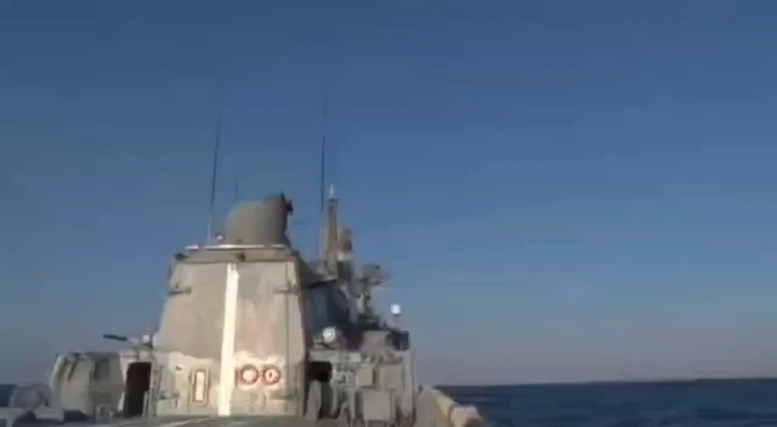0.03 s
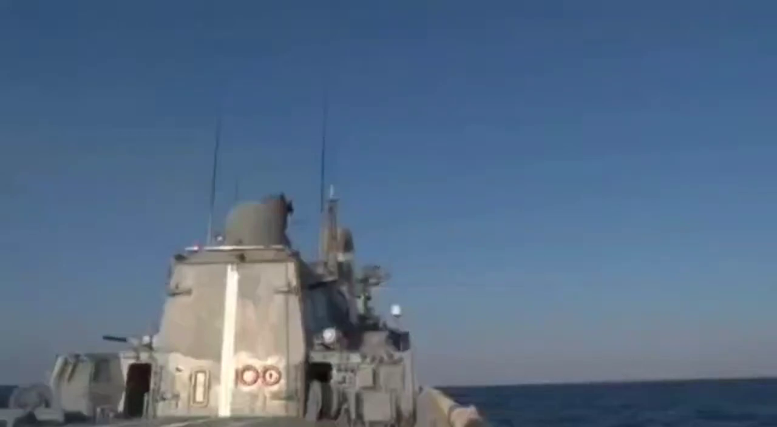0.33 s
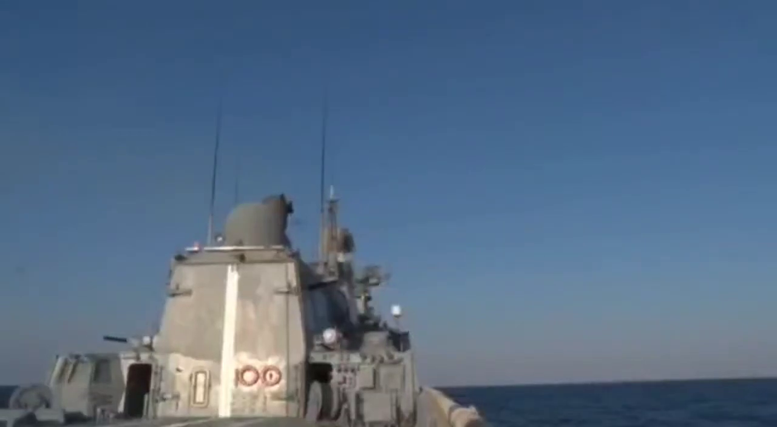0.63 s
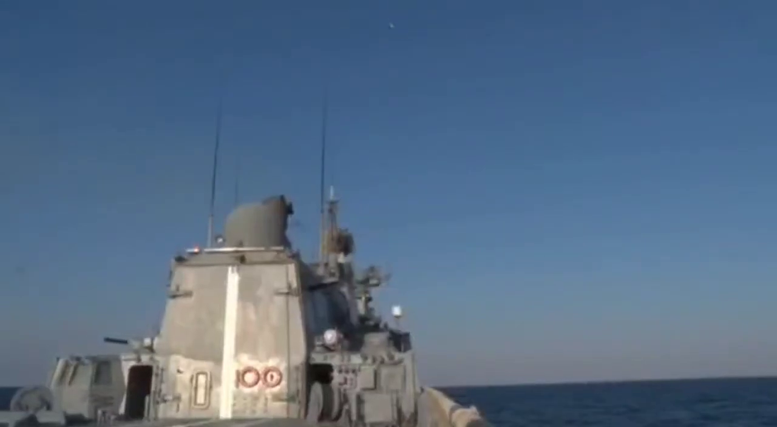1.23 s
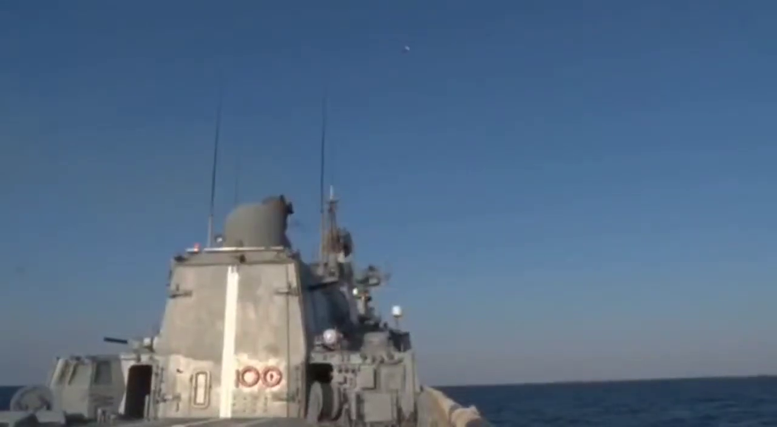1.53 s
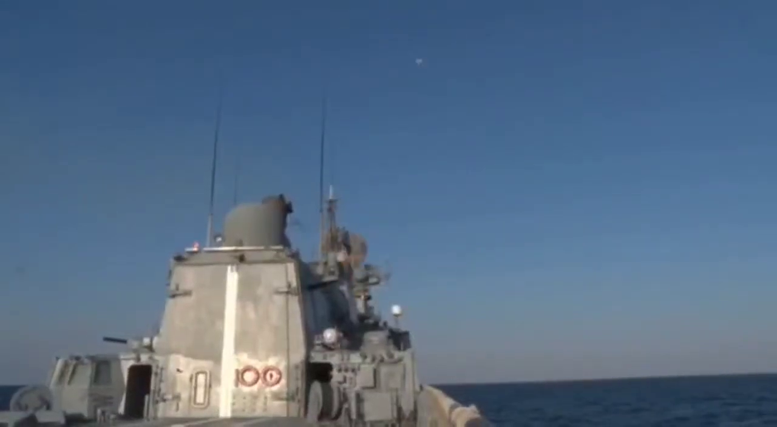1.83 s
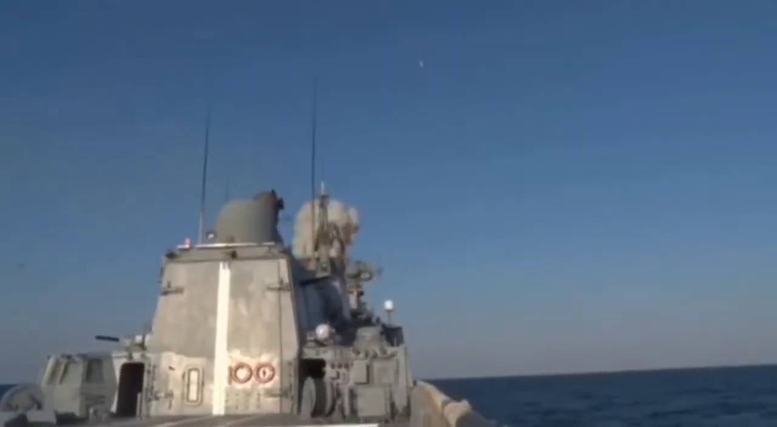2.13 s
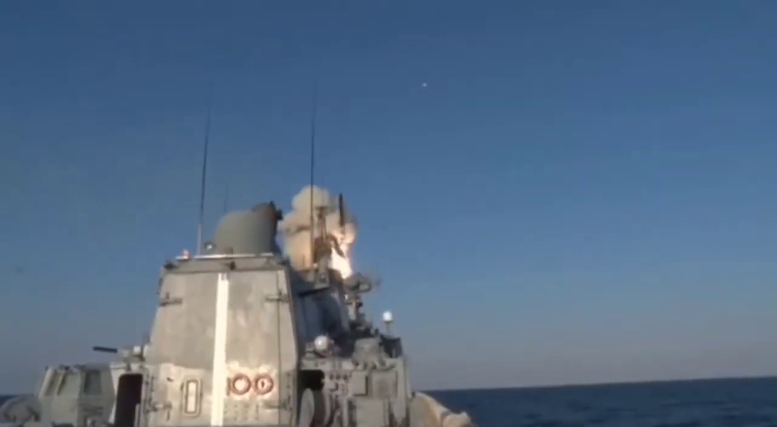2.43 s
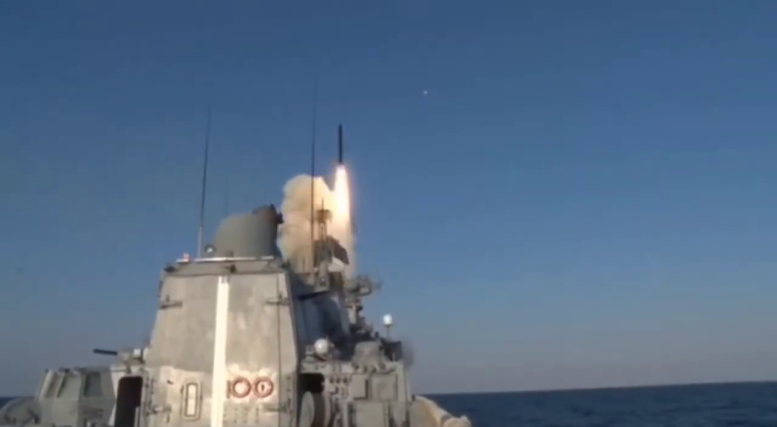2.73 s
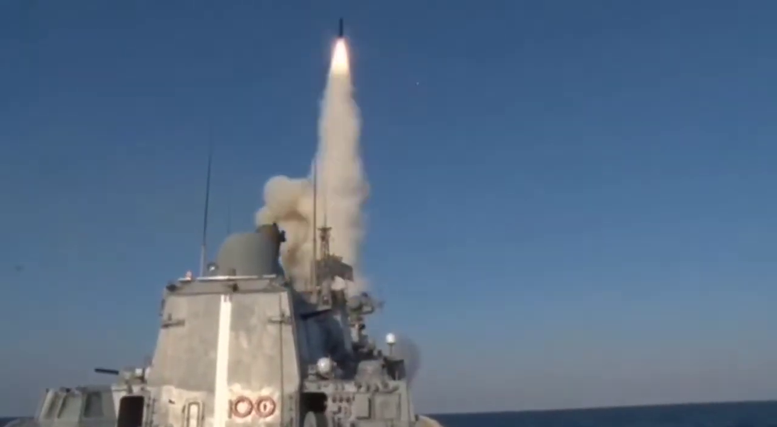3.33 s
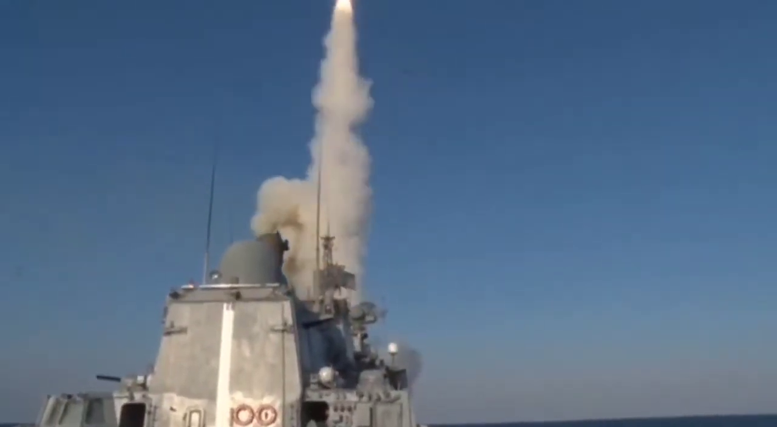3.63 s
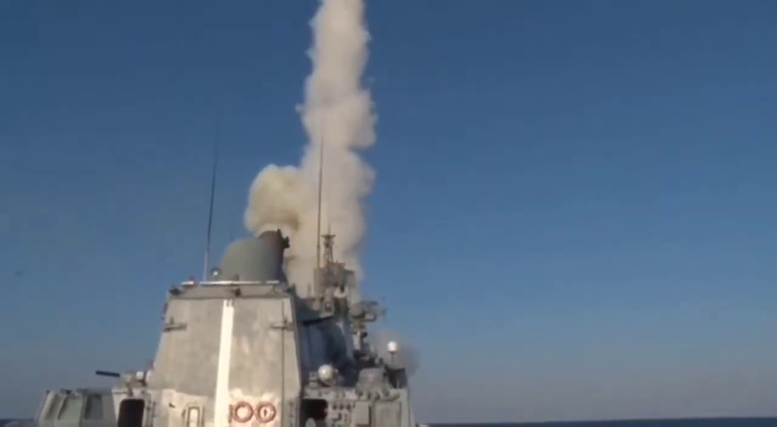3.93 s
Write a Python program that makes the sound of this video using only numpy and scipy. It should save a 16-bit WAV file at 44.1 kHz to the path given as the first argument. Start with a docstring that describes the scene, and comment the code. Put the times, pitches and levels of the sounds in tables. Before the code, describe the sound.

A missile launches from a warship. Soft wind and sea wash give way to low thumps and a hollow rush of gas, then the motor lights and swells into a loud, crackling roar that overloads the microphone.

```python
"""On a warship's deck, in wind and sea noise, a missile leaves its vertical launcher.
Gas throws it out with low thumps and a rush; then the motor lights and its roar deepens as it climbs.
The launcher rings under the gas and the flame. The sound bouncing off the deck arrives later and
later, sweeping the roar downward, and the microphone overloads."""
import sys
import numpy as np
from scipy import signal
from scipy.fft import rfft, irfft
from scipy.io import wavfile
from scipy.ndimage import uniform_filter1d

SR = 44100
rng = np.random.default_rng(int(sys.argv[2]) if len(sys.argv) > 2 else 0)


def waveform_to_disk(signal):
    """Save audio, clipped to [-1, 1], as 16-bit WAV at the path in sys.argv[1]."""
    frames = np.transpose(np.atleast_2d(signal))
    scaled = np.clip(frames, -1, 1) * 32767
    samples = np.round(scaled).astype(np.int16)
    wavfile.write(sys.argv[1], SR, samples)


N = 176400
T = np.arange(N) / SR

# The motor's four sounds, from low to high. Each row: pitch in Hz, strength in dB.
BOOM_TONE = [(15, -12.5), (35, -11), (70, -1), (110, 2.5), (160, -1), (230, -11.5), (600, -48.5)]
RUMBLE_TONE = [(20, -33.5), (70, -15), (120, -5.5), (170, -1.5), (215, -2), (270, -3), (350, -8.5),
               (700, -19), (2000, -51)]
ROAR_TONE = [(100, -21), (300, -8), (420, -1.5), (530, -1), (680, -4.5), (850, -5.5), (1100, -9.5),
             (1600, -13), (3000, -22.5), (9000, -39.5)]
HISS_TONE = [(300, -21.5), (900, -4), (1400, 0), (1900, -2.5), (2350, 0), (2750, -2.5), (3300, -2),
             (4800, -6.5), (6500, -12), (8300, -14), (9300, -34.5)]
# How the boom builds. Each row: time in seconds, level in dB.
BOOM_LEVELS = [(2.2, -45), (2.6, -30.5), (3.0, -32), (3.3, -14.5), (3.7, -13.5), (4, -14)]
# How the other three build. Each row: time in seconds, then rumble, roar and hiss levels in dB.
MOTOR_LEVELS = [(2.2, -50, -30.5, -57), (2.238, -40, -24.5, -41), (2.262, -23, -22.5, -28.5),
                (2.34, -35, -28, -25), (2.42, -43, -19.5, -24), (2.5, -31, -19, -20),
                (2.68, -18, -18.5, -14), (2.78, -8.5, -5.5, -8), (3.1, -8.5, -1.5, -3),
                (3.4, -6, -2.5, -7.5), (3.7, -9, -6.5, -10), (3.9, -4.5, -8, -12), (4, -2.5, -4.5, -12)]

def motor():
    """The nozzle hisses and shocks crackle; roar and rumble grow as the flame rises into the open."""
    rumble_db, roar_db, hiss_db = (curve(np.array(MOTOR_LEVELS)[:, [0, k]]) for k in (1, 2, 3))
    shock_hits = rng.random(N) < 900 / SR  # about 900 a second
    shocks = shock_hits * amp(3 * np.minimum(rng.exponential(1, N), 3))
    crackle = amp(-8.5) * unit(colour(shocks.mean() - shocks, HISS_TONE))
    hiss = rush(HISS_TONE, patchy_db=2, flutter_db=0.3, flutter_hz=72.6) + crackle
    roar = rush(ROAR_TONE, patchy_db=2.5, flutter_db=0.5, flutter_hz=31.4)
    rumble = rush(RUMBLE_TONE, patchy_db=0.5, flutter_db=0, flutter_hz=6.7)
    boom = rush(BOOM_TONE, patchy_db=1.5, flutter_db=0.5, flutter_hz=15) * loudness(BOOM_LEVELS)
    exhaust = boom + rumble * amp(rumble_db) + roar * amp(roar_db) + hiss * amp(hiss_db)
    lit = T > MOTOR_LEVELS[0][0]
    return deck_echo(exhaust) * lit


# How late the deck's echo arrives. Each row: time in seconds, delay in milliseconds.
ECHO_DELAYS = [(2.25, 0.64), (2.6, 1.13), (2.82, 1.52), (3.12, 2.21), (3.35, 2.87), (3.56, 3.8),
               (3.75, 4.3), (3.92, 4.7), (4, 4.66)]

def deck_echo(x):
    """The deck adds a duller echo that gets later and stronger as the missile climbs."""
    dull = signal.sosfilt(signal.butter(1, 2200, fs=SR, output="sos"), x)
    delay_ms = curve(ECHO_DELAYS)
    echo = np.interp(T - delay_ms / 1000, T, dull)
    share = .15 + .06 * delay_ms  # stronger as the sound comes down more steeply
    return (x + share * echo) / np.hypot(1, share)


# The venting hiss and the rush of gas. Each row: pitch in Hz, strength in dB.
VENT_TONE = [(300, -5), (850, -4.5), (1100, -7), (2300, -4), (3500, -5.5), (5000, -8), (7000, -16.5),
             (9000, -27)]
GAS_TONE = [(18, -37), (30, -11), (54, 1), (148, -6), (207, -1.5), (334, -16.5), (526, -12), (565, -17.5),
            (607, -16.5), (668, -17), (1240, -25), (2000, -26.5), (2660, -28.5), (3630, -29.5), (6000, -41),
            (7800, -47), (9000, -59.5), (11700, -70), (19800, -120)]
# How each rises and falls. Each row: time in seconds, level in dB.
VENT_LEVELS = [(1.685, -51), (1.715, -33.5), (1.75, -43.5), (1.785, -34.5), (1.818, -35.5), (1.835, -50),
               (1.86, -44), (1.885, -39), (2, -51), (2.2, -38)]
GAS_LEVELS = [(1.69, -59), (1.72, -31.5), (1.78, -24), (1.81, -21.5), (1.84, -33), (1.88, -22.5),
              (1.93, -18), (2.01, -19), (2.08, -21.5), (2.16, -21), (2.225, -24), (2.3, -17), (2.5, -29),
              (2.8, -35)]

def ejection():
    """Venting gas hisses, then rushes out of the launch tube with a hollow sound."""
    vent = rush(VENT_TONE, patchy_db=1, flutter_db=1, flutter_hz=90) * loudness(VENT_LEVELS)
    gas = rush(GAS_TONE, patchy_db=0.5, flutter_db=-0.5, flutter_hz=50) * loudness(GAS_LEVELS)
    return (vent + gas) * (T > GAS_THUMPS[0][0])


# The thumps of the launch. Each row: start in seconds, pitch in Hz, level in dB, swell time in seconds.
GAS_THUMPS = [(1.683, 73.5, -7.5, .009), (1.785, 63.6, -0.5, 0.0088), (1.807, 60, -8, 0.0057),
              (1.863, 69, -10.5, 0.0049), (2.169, 70, -4.5, 0.0073), (2.194, 52, -5, 0.0045)]

def thumps():
    """Each pressure wave from the gas swells and dies within two or three slow vibrations."""
    out = np.zeros(N)
    for start, hz, db, swell in GAS_THUMPS:
        age = np.maximum(T - start, 0)
        rise_and_fall = (age / swell) ** 2 * np.exp(2 * (1 - age / swell))
        out -= amp(db) * rise_and_fall * np.sin(2 * np.pi * hz * age)
    return out


# The launcher's notes. Each row: pitch in Hz, width in Hz, level in dB under gas, then under flame.
LAUNCHER_NOTES = [(184, 41, -26.5, -23.5), (524, 100, -37.5, -30), (810, 94, -45, -31),
                  (2036, 69, -42.5, -36.5), (2170, 130, -51, -36.5), (2347, 96, -45.5, -31.5),
                  (2545, 67, -49.5, -38.5)]
# How hard gas and flame drive those notes. Each row: time in seconds, added level in dB.
GAS_DRIVE = [(1.7, -27), (1.86, -12), (1.93, -3), (2.05, -2), (2.2, -3), (2.3, -12)]
FLAME_DRIVE = [(2.225, -31), (2.264, -1), (2.36, -1.5), (2.55, 5), (2.7, -3), (3.0, -20)]

def launcher():
    """The launcher rings with the gas, then with the flame, until the missile is clear."""
    gas, flame = (loudness(rows) * (T > rows[0][0]) * (T < rows[-1][0])
                  for rows in (GAS_DRIVE, FLAME_DRIVE))
    return sum(ringing(hz, width) * (gas * amp(gas_db) + flame * amp(flame_db))
               for hz, width, gas_db, flame_db in LAUNCHER_NOTES)


# The breeze and the gust. Each row: pitch in Hz, strength in dB.
BREEZE_TONE = [(15, -10), (35, 1.5), (90, 0.5), (200, -4.5), (400, -17), (800, -35.5), (3000, -64)]
GUST_TONE = [(12, -6), (30, 2.5), (60, -1.5), (130, -5), (260, -11.5), (450, -26), (1500, -57.5)]
# How the breeze rises and falls. Each row: time in seconds, level in dB.
BREEZE_LEVELS = [(.08, -38), (.25, -29), (.42, -28.5), (.5, -34.5), (.75, -35), (1, -32), (1.1, -29.5),
                 (1.25, -30.5), (1.45, -27.5), (1.65, -35.5)]

def wind():
    """Wind beats unevenly on the microphone, with one strong gust."""
    breeze = rush(BREEZE_TONE, patchy_db=1.5, flutter_db=1.2, flutter_hz=22) * loudness(BREEZE_LEVELS)
    burst = np.exp(-((T - .435) / .035) ** 4)  # strongest at 0.435 seconds
    gust = unit(colour(rng.standard_normal(N), GUST_TONE)) * burst
    return breeze + amp(-20.5) * gust


# The water's wash and the wave. Each row: pitch in Hz, strength in dB.
WASH_TONE = [(120, -13), (200, -3.5), (275, -5), (403, -13.5), (465, -10.5), (504, -13), (774, -21.5),
             (1310, -24), (2560, -26.5), (3200, -32), (4400, -36.5), (9000, -54.5), (11700, -73),
             (19800, -120)]
WAVE_TONE = [(150, -25), (350, 6.5), (600, 3), (800, 2), (1300, -23), (4000, -41.5)]
# How each rises and falls. Each row: time in seconds, level in dB.
WASH_LEVELS = [(.08, -36.5), (.2, -35), (.42, -35.5), (.5, -43), (.7, -40), (.95, -40.5), (1.2, -38.5),
               (1.5, -40.5), (1.7, -39)]
WAVE_LEVELS = [(.5, -54), (.65, -44), (.9, -53), (1.15, -40.5), (1.35, -43.5), (1.65, -55)]

def sea():
    """Water washes along the hull, and one wave slowly surges."""
    wash = rush(WASH_TONE, patchy_db=1.2, flutter_db=-0.5, flutter_hz=12)
    wash = signal.sosfilt(signal.butter(2, 230, "high", fs=SR, output="sos"), wash)
    wave = rush(WAVE_TONE, patchy_db=0.5, flutter_db=1, flutter_hz=12)
    return unit(wash) * loudness(WASH_LEVELS) + wave * loudness(WAVE_LEVELS)


def machinery():
    """The ship's machinery gives a faint, steady whine."""
    return amp(-63.5) * ringing(hz=2495, width_hz=53)


def amp(db):
    """Turns decibels (dB) into a number to multiply a sound by."""
    return 10 ** (np.asarray(db) / 20)


def unit(x):
    """Scales a signal to an average power of 1."""
    return x / np.sqrt(np.mean(x ** 2) + 1e-20)


def curve(rows):
    """Joins rows of time and value with straight lines."""
    return np.interp(T, *np.transpose(rows))


def loudness(rows):
    """Turns rows of time and dB into a moving volume control."""
    return amp(curve(rows))


def colour(x, tone):
    """Makes each pitch louder or softer, following rows of Hz and dB."""
    size = 4096
    hz, db = np.transpose(tone)
    pitches = abs(np.fft.fftfreq(size, 1 / SR))
    log_gain = np.log(amp(np.interp(np.log(pitches + 1), np.log(hz + 1), db)))
    response = np.exp(np.conj(signal.hilbert(log_gain)))  # rings after a sound, never before
    taps = np.fft.ifft(response).real[:size // 2]
    return signal.oaconvolve(x, taps)[:N]


def drift(rate_hz):
    """A smooth random wobble; a higher rate makes it quicker."""
    hz = np.fft.rfftfreq(N, 1 / SR)
    noise = rfft(rng.standard_normal(N))
    return unit(irfft(noise * np.exp(-(hz / rate_hz) ** 2) * (hz > rate_hz / 10), N))


def turbulence(patchy_db):
    """Noise whose level varies in small patches of time and pitch."""
    grid = signal.stft(rng.standard_normal(N), nperseg=512, noverlap=384)[2]
    patches = uniform_filter1d(rng.standard_normal(grid.shape), size=6, axis=0)
    patches = unit(uniform_filter1d(patches, size=14, axis=1))
    return unit(signal.istft(grid * amp(patchy_db * patches), nperseg=512, noverlap=384)[1][:N])


def rush(tone, patchy_db, flutter_db, flutter_hz):
    """Rushing noise with the given tone; all its pitches flutter together."""
    return unit(colour(turbulence(patchy_db), tone) * amp(flutter_db * drift(flutter_hz)))


def ringing(hz, width_hz):
    """Noise narrowed until it rings around one pitch."""
    b, a = signal.iirpeak(hz, hz / width_hz / np.sqrt(2), fs=SR)
    return unit(signal.lfilter(b, a, signal.lfilter(b, a, rng.standard_normal(N))))


def low_pass(x, hz):
    """Cuts away the sound above the given pitch."""
    return signal.oaconvolve(x, signal.firwin(701, hz, window=("kaiser", 8), fs=SR), "same")


def scene():
    """All the sounds reach one microphone."""
    mix = sea() + wind() + machinery() + thumps() + ejection() + launcher() + motor()
    return np.tile(mix, (2, 1))


# Pitches that the microphone delays slightly. Each row: pitch in Hz, width in Hz.
DELAYED_BANDS = [(2500, 1600), (4500, 1800), (7000, 2200)]

def overload(x, ceiling=.48):
    """The microphone flattens loud peaks; delaying some pitches then leaves spikes on them."""
    treble = .2 * signal.sosfilt(signal.butter(1, 1500, "high", fs=SR, output="sos"), x)
    x = treble + ceiling * np.tanh((x - treble) / ceiling)  # a little treble slips past
    for hz, width in DELAYED_BANDS:
        x = x - 2 * signal.lfilter(*signal.iirpeak(hz, hz / width, fs=SR), x)
    return x


# The microphone's own tone. Each row: pitch in Hz, boost in dB.
MIC_TONE = [(20, 2), (300, 0.5), (1000, 2), (2500, 0), (5000, 1.5), (9000, 2)]

def record(dry):
    """The microphone overloads, loud stretches are turned down, and the tallest peaks are cut off."""
    switch_on_s, fade_in_s, limit_db, peak = .082, .004, -11, .76
    x = colour(overload(dry[0]), MIC_TONE)
    x = x * np.clip((T - switch_on_s) / fade_in_s, 0, 1)
    power_db = 10 * np.log10(abs(uniform_filter1d(x ** 2, size=3000)) + 1e-12)
    x = x * amp(-np.maximum(power_db - limit_db, 0))
    x = np.clip(low_pass(x, hz=9080), -peak, peak)
    return np.tile(low_pass(x, hz=15900), (2, 1))


dry = scene()
out = record(dry)
waveform_to_disk(out)
```